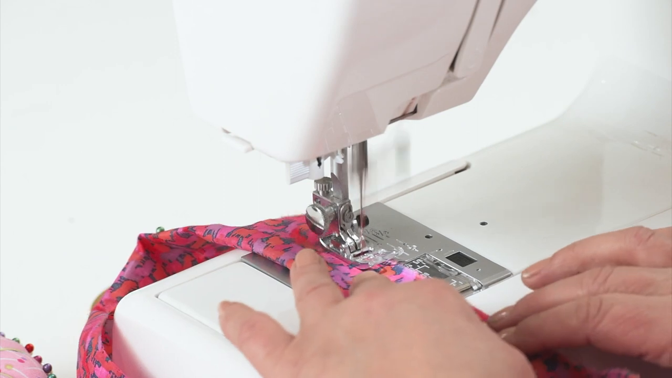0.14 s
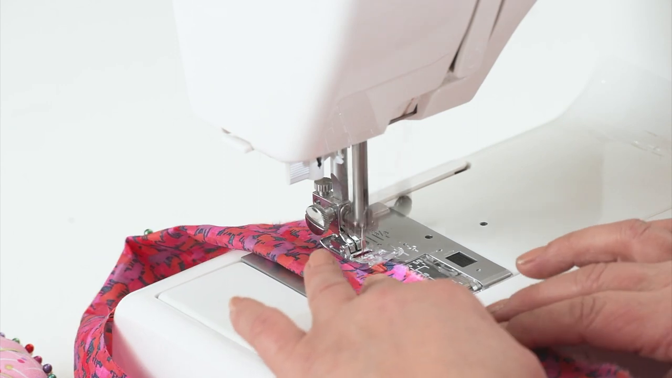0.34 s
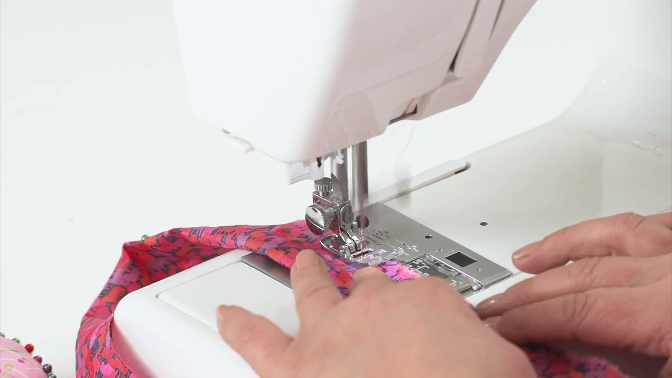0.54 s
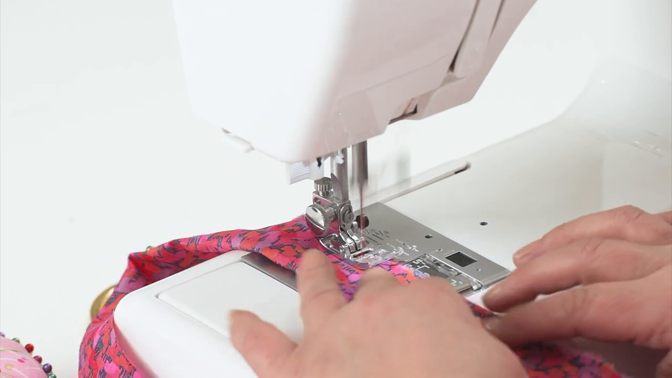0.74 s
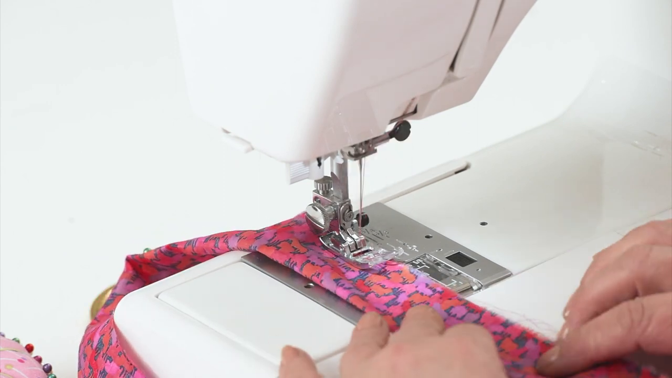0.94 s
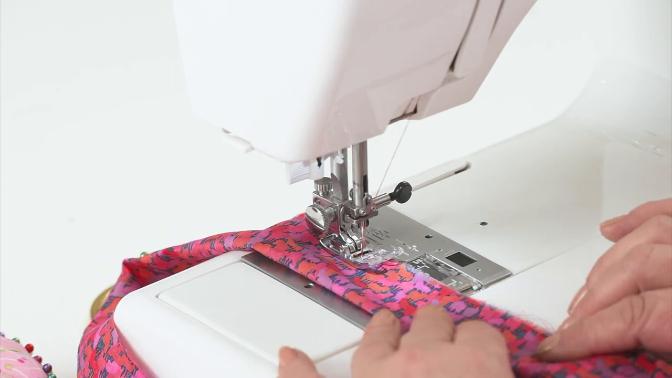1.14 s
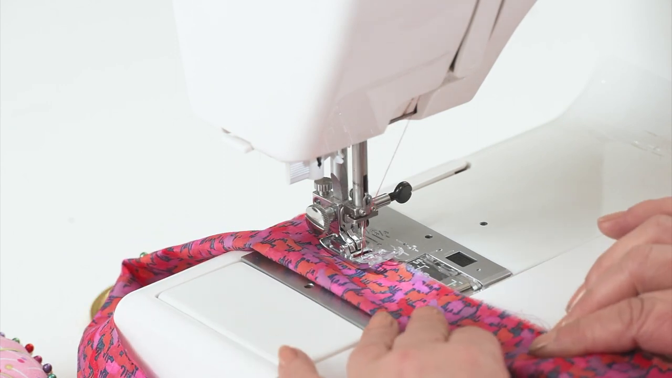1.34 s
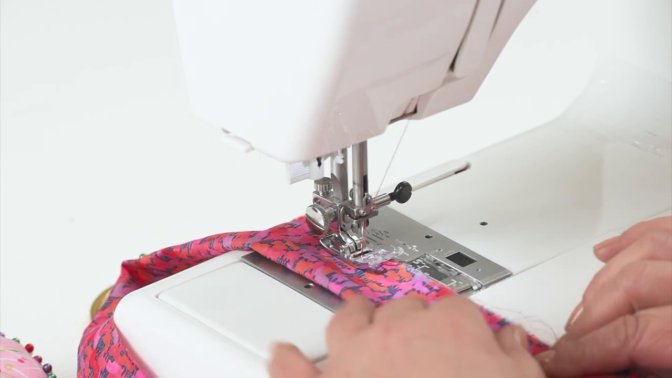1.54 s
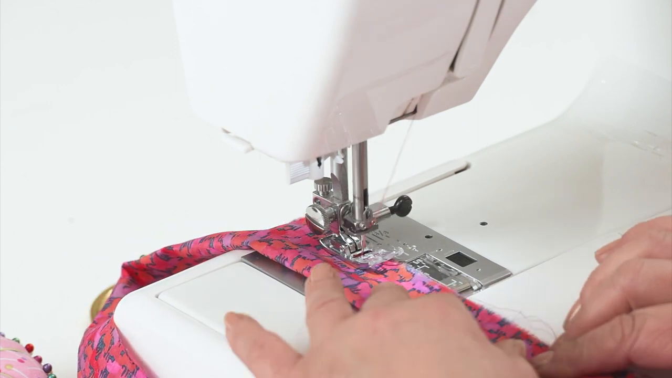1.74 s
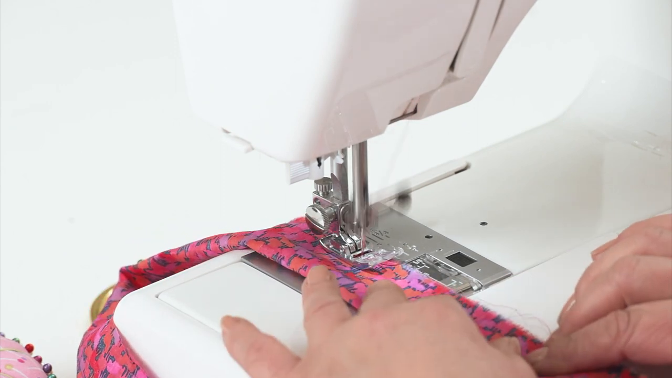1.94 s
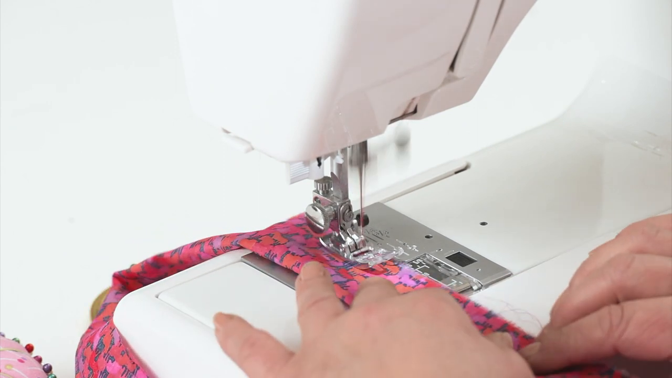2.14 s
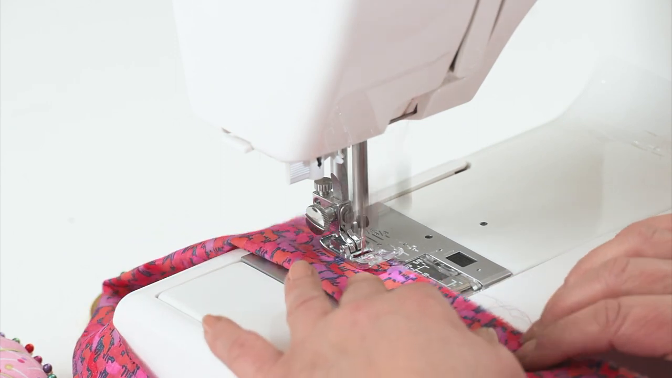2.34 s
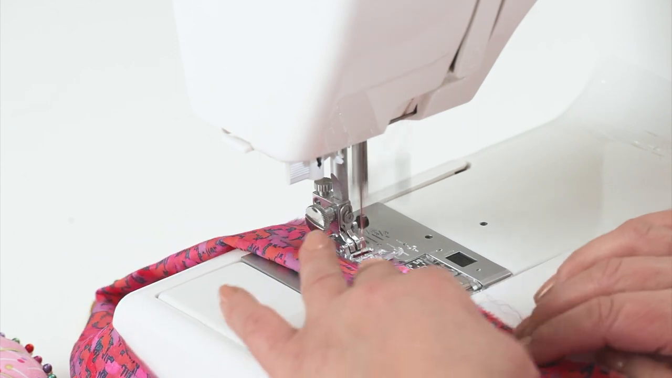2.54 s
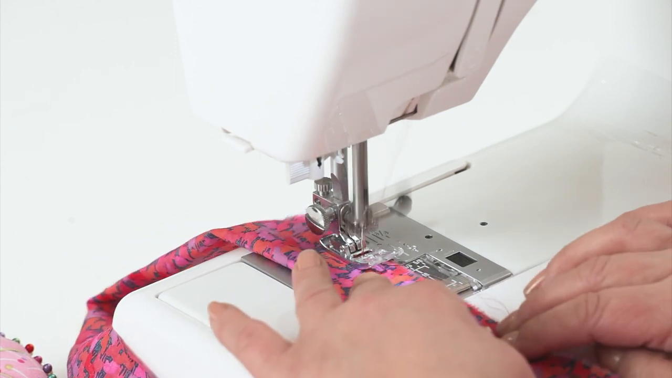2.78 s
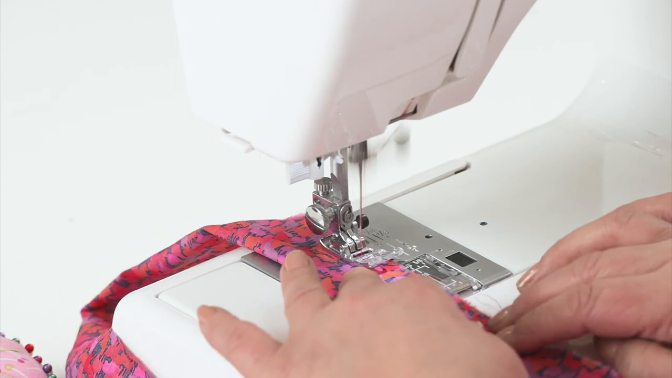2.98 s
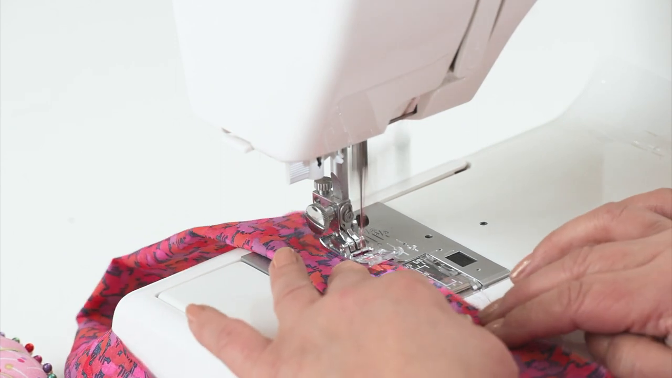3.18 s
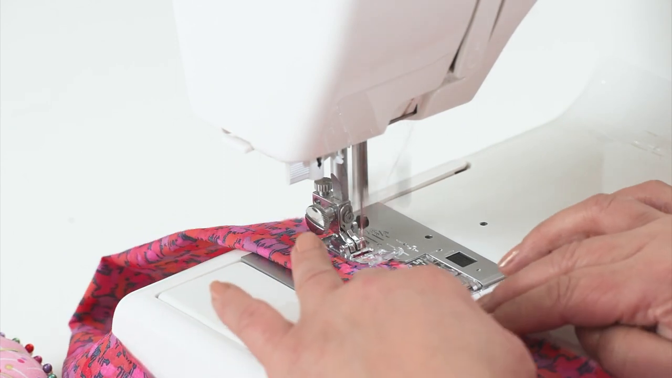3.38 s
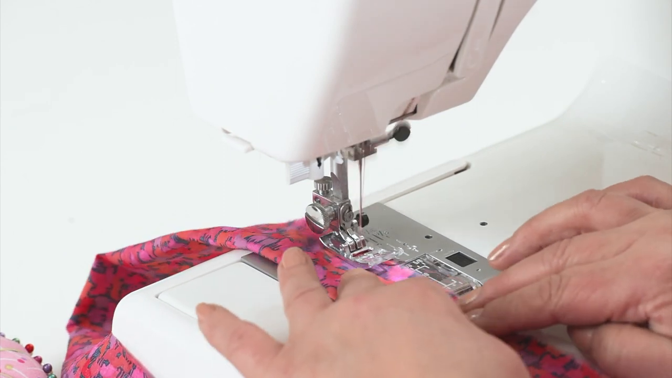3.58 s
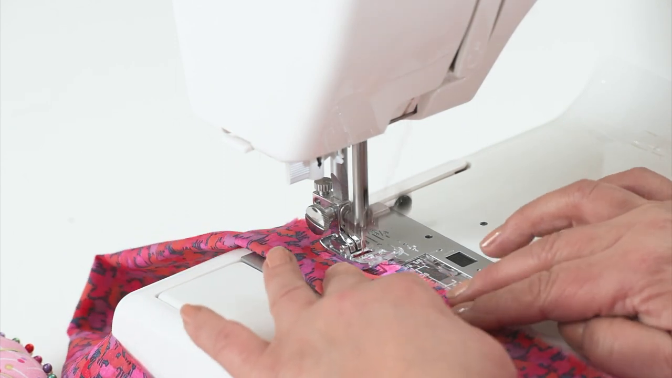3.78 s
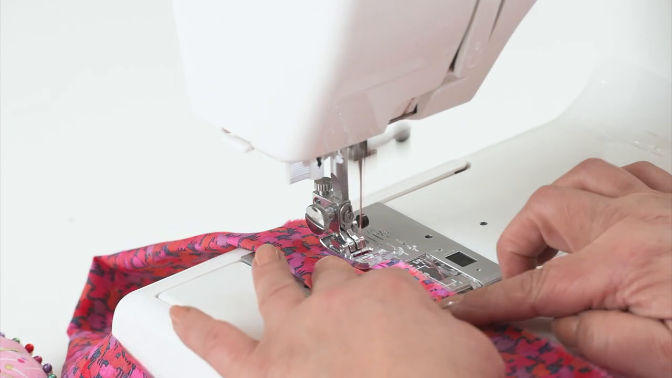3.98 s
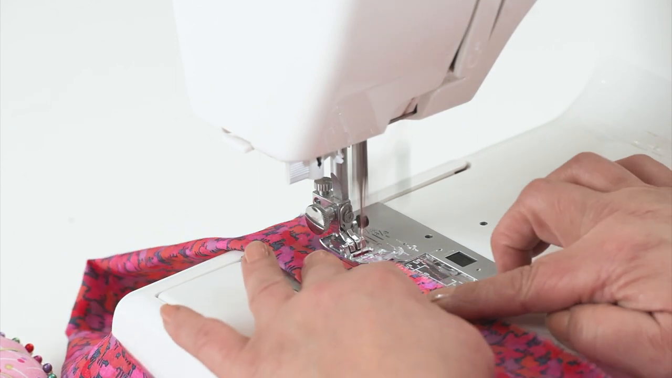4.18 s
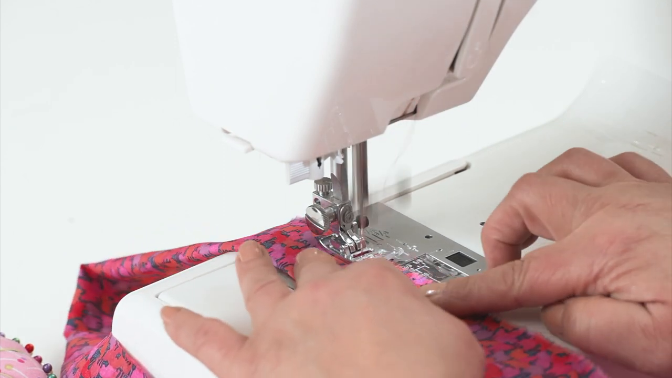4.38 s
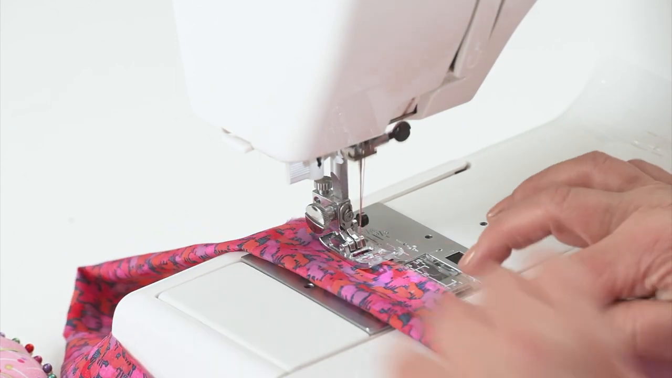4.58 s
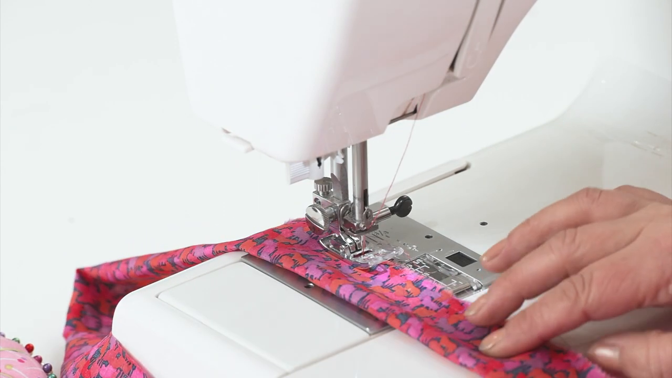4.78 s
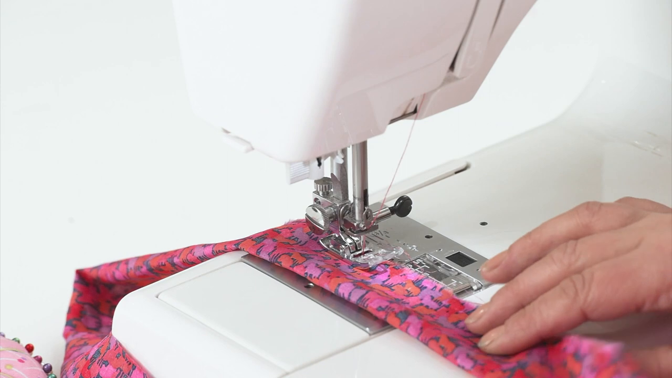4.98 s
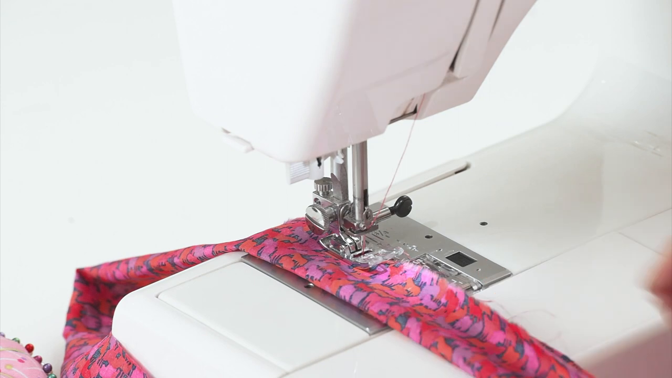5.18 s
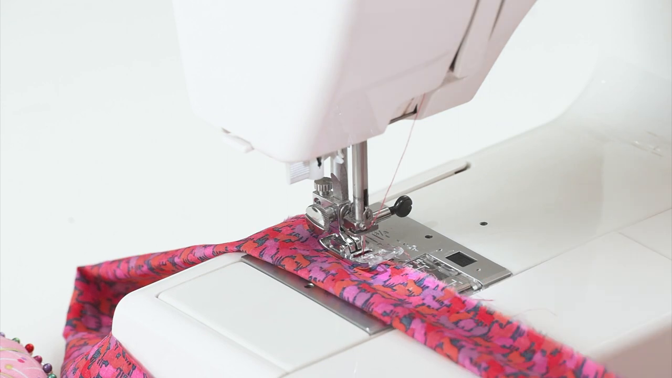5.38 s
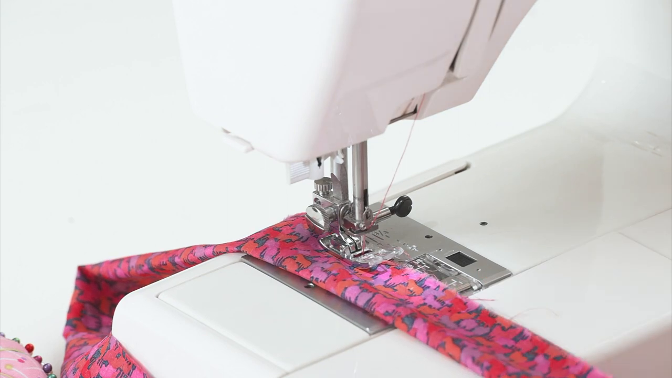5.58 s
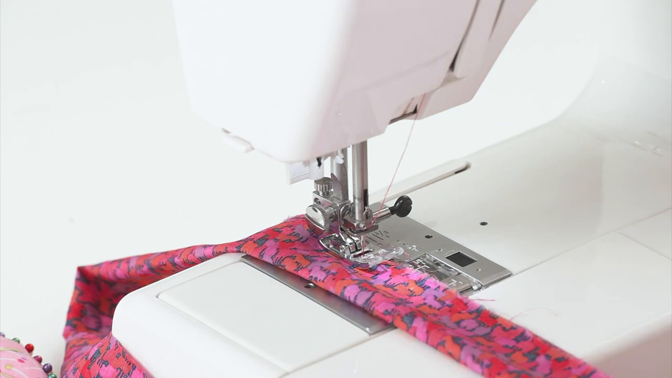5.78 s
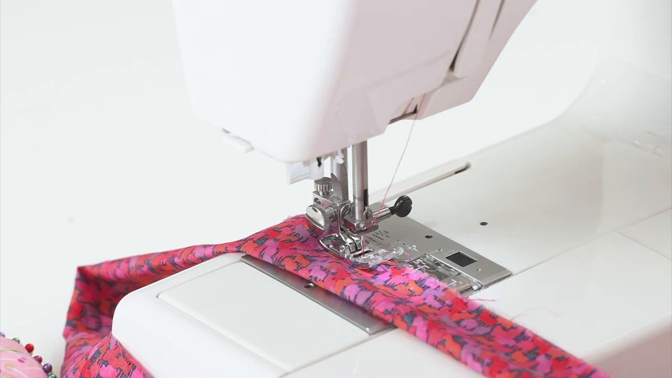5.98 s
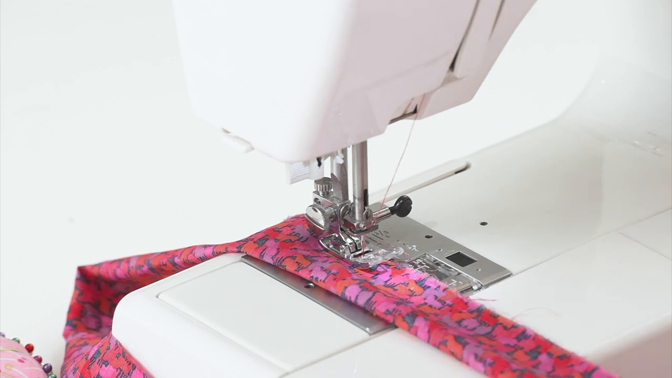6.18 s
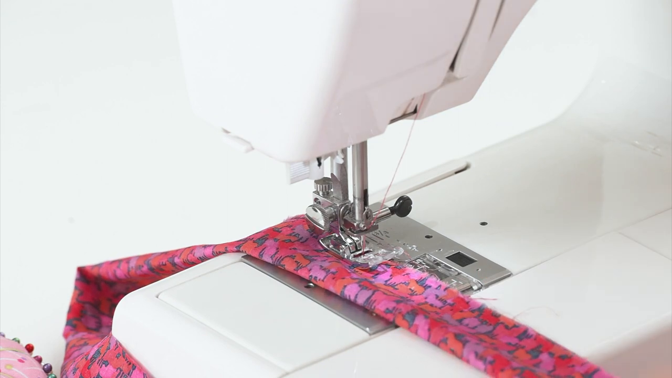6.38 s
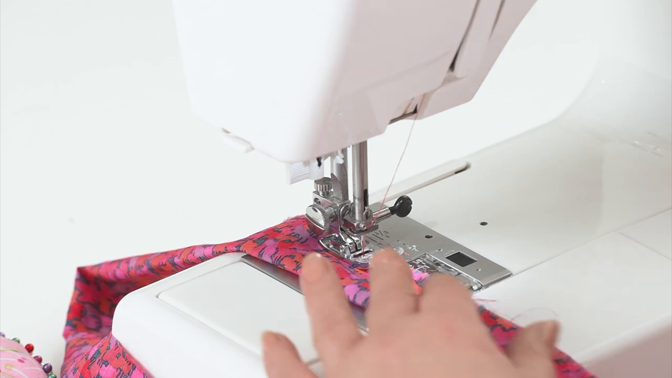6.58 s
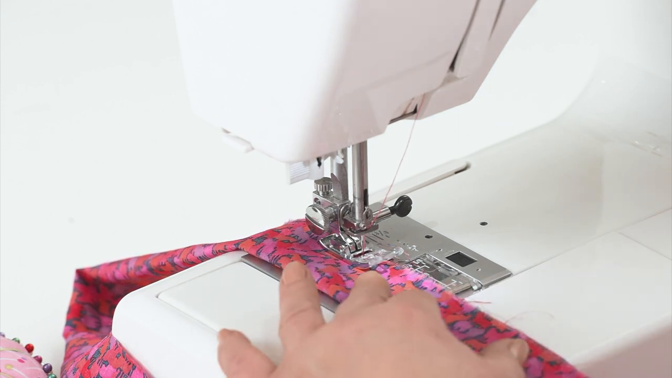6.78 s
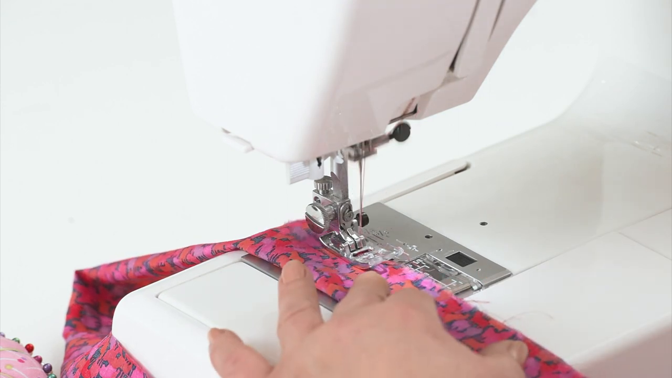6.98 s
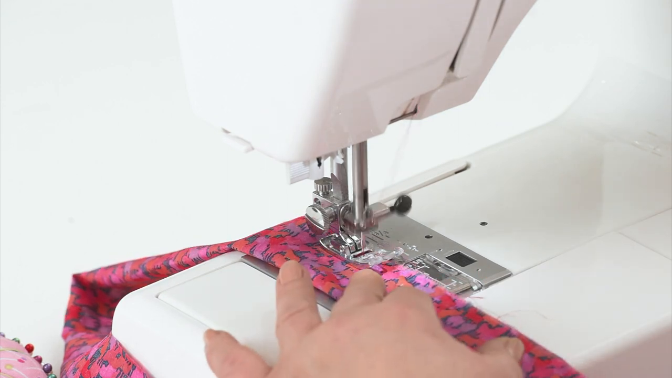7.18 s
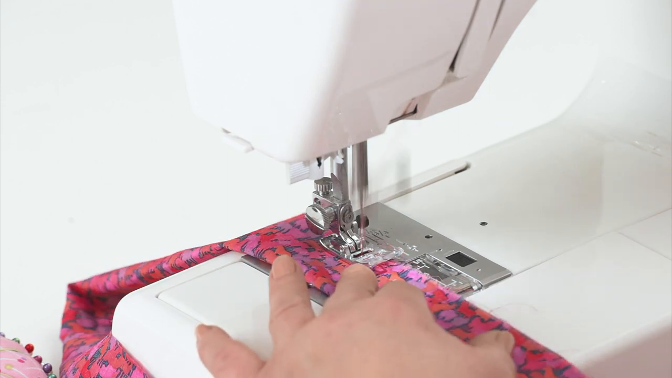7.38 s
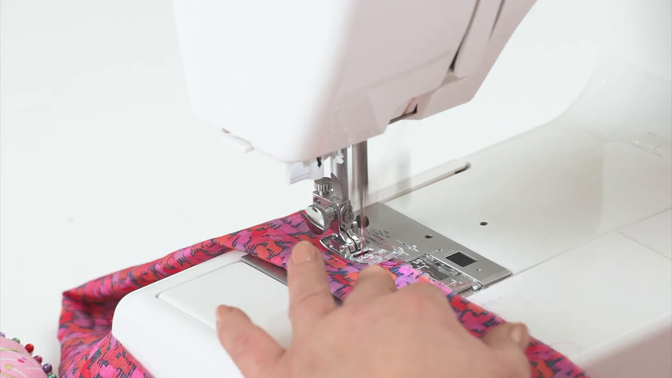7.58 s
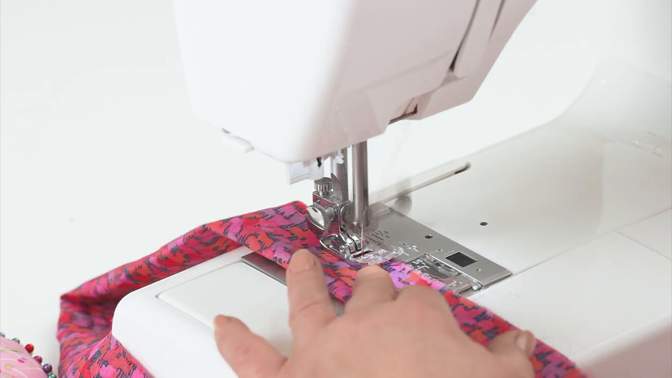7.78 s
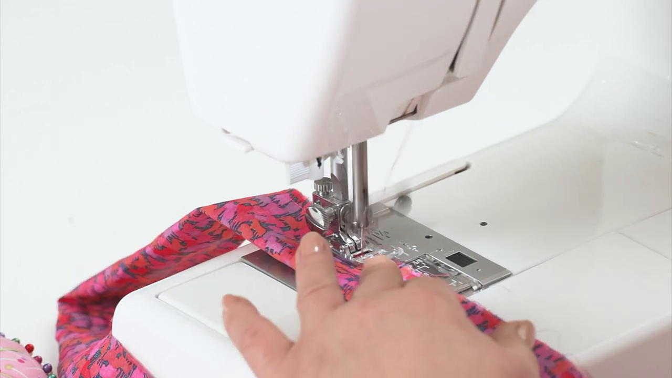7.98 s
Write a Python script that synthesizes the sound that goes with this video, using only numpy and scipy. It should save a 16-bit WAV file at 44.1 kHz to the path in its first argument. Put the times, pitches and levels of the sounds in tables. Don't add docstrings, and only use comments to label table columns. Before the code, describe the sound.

Close indoor sound of an electric sewing machine, already stitching at about eleven turns a second: woody, hollow casing knocks, gear rattle, belt whirr, low motor hum and one bright tick per turn. From 0.75 s it slows quickly, with small pedal clunks around 1.0-1.1 s, and nearly stops by 1.3 s. After a faint knock and cloth touch, a click and straining buzz at 1.65 s start the second run; it climbs to full speed by 2.4 s and chatters evenly at twelve turns a second until 4.35 s. It winds down by 4.9 s. At 5.04 s a hand drops on the table with a quick, dull rebounding knock; sparse clicks and soft fabric rustles follow over faint room tone. At 6.7 s the motor hums and groans again, loud at 7.1 s, and the ticking rattle accelerates until the cut at about 8 s.

```python
import sys
import numpy as np
from scipy import signal
from scipy.fft import rfft, irfft, next_fast_len
from scipy.io import wavfile

SR = 44100
rng = np.random.default_rng(int(sys.argv[2]) if len(sys.argv) > 2 else 0)


def to_wav(sig):
    pcm = np.clip(np.atleast_2d(sig), -1, 1) * 32767
    pcm = np.round(pcm).astype(np.int16)
    wavfile.write(sys.argv[1], SR, pcm.T)


def how_loud(loudness_db):
    steps = np.asarray(loudness_db, float) / 20
    return 10 ** steps


N = 354123
FULL_SPEED = 12


def rms_one(x):
    return x / np.sqrt(np.mean(x ** 2) + 1e-20)


def in_time(rows, outside=None):
    s, *columns = np.transpose(rows)
    return [np.interp(np.arange(N) / SR, s, c, left=outside, right=outside) for c in columns]


def band(x, low_hz, high_hz):
    edges = [low_hz, min(high_hz, .45 * SR)]
    return signal.sosfilt(signal.butter(2, edges, "band", fs=SR, output="sos"), x)


def drift(rate):
    r = np.exp(-80 * np.pi * rate / SR)
    white = rng.standard_normal(N // 40 + 2002)
    slow = signal.lfilter([1], [1, -2 * r, r * r], white)[2000:]
    return np.interp(np.arange(N) / 40, np.arange(len(slow)), rms_one(slow))


def ring(clicks, hz, t60):
    r, w = how_loud(-60 / (t60 * SR)), 2 * np.pi * hz / SR
    return signal.lfilter([0, np.sin(w)], [1, -2 * r * np.cos(w), r * r], clicks + 1e-18)


def clicks_at(seconds, sizes):
    at, out = np.round(seconds * SR).astype(int), np.zeros(N)
    inside = (at >= 0) & (at < N)
    np.add.at(out, at[inside], sizes[inside])
    return out


def bursts(seconds, peak_db, t60):
    fall = how_loud(-60 / (t60 * SR))
    envelope = signal.lfilter([1], [1, -fall], clicks_at(seconds, how_loud(peak_db)) + 1e-18)
    return envelope * rng.standard_normal(N)


def tone(hz, gain, orders):
    phase = 2 * np.pi * np.cumsum(hz) / SR
    return np.sqrt(2) * gain * sum(how_loud(db) * np.sin(int(k) * phase) for k, db in orders)


def noise_bands(spectrum):
    edges, white = 20 * 2 ** (np.arange(30) / 3), rng.standard_normal((2, N))
    hz, db = np.transpose(spectrum)
    for k, (low, high) in enumerate(zip(edges, edges[1:])):
        centre = np.sqrt(low * high)
        gain = how_loud(np.interp(np.log(centre), np.log(hz), db))
        yield centre, gain * band(white[k % 2], low, high)


# time [s], speed [turns per s].
SPEED = [(0, 11.028), (.732, 10.726), (.83, 7.45), (1.27, .674), (1.64, .674), (1.8, 3.3), (1.93, 6.045),
         (2.133, 9.91), (2.411, 11.535), (2.878, 11.994), (4.338, 12.08), (4.515, 7.069), (4.92, .198),
         (6.74, .198), (6.93, 3.866), (7.206, 8.427), (7.486, 10.041), (8.03, 10.863)]


def shaft():
    speed, = in_time(SPEED)
    return np.cumsum(speed) / SR - .67, speed


def speed_at(seconds):
    return np.interp(seconds, *np.transpose(SPEED))


def contact_times(turns, share, jitter_s):
    angle = np.arange(-1, turns[-1])[:, None] + share
    at = np.interp(angle, turns, np.arange(N) / SR, left=-1, right=-1)
    return at + jitter_s * rng.standard_normal(at.shape)


# speed [turns per s], then the levels of casing, gears,
# brushes and air hiss [dB].
LOUDNESS = [(.25, -80, -85, -75, -76), (.7, -62, -82, -75.5, -78), (2.1, -47, -60.5, -68.5, -76),
            (4, -35, -51, -61.5, -70), (6, -31, -40.5, -58.5, -63), (9, -27.5, -36.5, -53, -64),
            (10.8, -27.5, -35, -51, -64), (12, -23.5, -32.5, -50, -62)]


def running_levels(speed):
    law_speed, *levels = np.transpose(LOUDNESS)
    return [np.interp(speed, law_speed, db) for db in levels]


# resonance [Hz], level [dB], ring time t60 [s].
THUD = [(155, -2, 0.078), (223, 0, 0.049)]


def needle_bar(turns):
    at = contact_times(turns, .375, jitter_s=0.00049).ravel()
    in_step = np.exp(-((speed_at(at) - 10.64) / 0.88) ** 2)
    spread_db = 4 * (1.2 - in_step) * rng.standard_normal(len(at))
    thuds = clicks_at(at, -how_loud(-5 + 22.5 * in_step + spread_db))
    return sum(how_loud(db) * ring(thuds, hz, t60) for hz, db, t60 in THUD)


# place [share of turn], signed direction of the push, level [dB].
CONTACTS = [(0.028, 0.73, -6.5), (0.091, 0.85, -7), (0.152, -1.12, 0.5), (0.191, 1, -10),
            (0.242, -1.5, -10), (.36, -0.75, 3), (0.441, 0.29, 4), (0.488, -0.51, -1), (0.572, 1, -3.5),
            (0.678, 0.7, -2.5), (0.789, 0.81, -2.5), (0.903, -1.06, -11.5)]
# pitch [Hz], level [dB], ring time t60 [s].
CASING = [(49.7, -17, 0.11), (104.5, -17.5, 0.25), (142.5, -.5, 0.17), (205.5, 3.5, 0.07),
          (276.5, -0.5, 0.063), (335, -4.5, 0.14), (375, 0.5, 0.1), (400, -12.5, 0.11), (555.6, -7, 0.19),
          (606, -7.5, 0.081), (735, -13.5, 0.13), (868, -16.5, 0.082)]


def casing(turns, level_db):
    share, way, knock_db = np.transpose(CONTACTS)
    at = contact_times(turns, share, jitter_s=.00025)
    out = 0
    for hz, mode_db, t60 in CASING:
        spread_db = 1.5 * rng.standard_normal(at.shape)
        sizes = way * how_loud(knock_db + mode_db + spread_db)
        out = out + ring(clicks_at(at.ravel(), sizes.ravel()), hz, t60)
    out = rms_one(out) + needle_bar(turns)
    return how_loud(level_db - 5.0) * band(out, 40, 3200)


def tick_db(seconds):
    speed = speed_at(seconds)
    return -25 + 2 * np.log2(speed / FULL_SPEED) - 40 * (speed < 3.4)


# pitch [Hz], level [dB], ring time t60 [s].
HOOK = [(6790, -18, 0.01), (7137, -15, 0.018), (7790, -8.5, 0.0055), (8300, -15, 0.0074)]
# place [share of turn], level against the main tick [dB].
SMALL_TICKS = [(.16, -21.5), (.35, -21), (.47, -19.5), (.65, -35)]


def hook(turns):
    s = contact_times(turns, 0, jitter_s=.0003).ravel()
    peak_db = tick_db(s) + 0.7 * rng.standard_normal(len(s))
    chatter = bursts(s - .001, peak_db, 0.029) + bursts(s + 0.002, peak_db - 13.5, 0.093)
    out = how_loud(-14) * band(chatter, 6100, 7600)
    out += how_loud(-10.5) * band(chatter, 2900, 11800)
    out += how_loud(-18.0) * band(band(chatter, 12400, 12600), 10000, 15500)
    out += sum(how_loud(db - 12.5) * ring(chatter, hz, t60) for hz, db, t60 in HOOK)

    share, under_db = np.transpose(SMALL_TICKS)
    at = contact_times(turns, share, jitter_s=0.00073)
    small_db = tick_db(at) + under_db + 3.5 * rng.standard_normal(at.shape)
    out += how_loud(2.0) * band(bursts(at.ravel(), small_db.ravel(), 0.016), 6100, 13000)
    return out


# place [share of turn], pitch [Hz], level over the gears [dB],
# decay t60 [s].
TAPS = [(0.032, 1820, 4, 0.09), (0.062, 1250, 7, 0.071), (0.113, 1660, -3.5, 0.039),
        (.44, 1300, -13, 0.065), (.55, 2585, -1, 0.041), (0.592, 2340, 1, 0.032), (.66, 2750, -0.5, 0.027),
        (.01, 5190, -8, 0.045)]


def taps(turns, gears_db):
    out = 0
    for share, hz, over_db, t60 in TAPS:
        at = contact_times(turns, share, jitter_s=0.00092).ravel()
        spread_db = 2.0 * rng.standard_normal(len(at))
        out = out + band(bursts(at, over_db + 15 + spread_db, t60), hz * .945, hz * 1.06)
    return how_loud(gears_db) * out


# frequency [Hz], level [dB per Hz].
RATTLE = [(18, -45), (30, -83), (111, -3.5), (302, -2), (363, 1.5), (472, -8.5), (552, -3), (1060, -17),
          (1890, -24.5), (2160, -37.5), (2340, -27.5), (4270, -30), (4750, -28.5), (7040, -26),
          (15900, -51.5)]
# pitch [Hz], width [Hz], level [dB].
RATTLE_PEAKS = [(606, 30, -16.5), (823, 75, -20.5), (1250, 270, -21.5), (1820, 45, -15.5), (2340, 30, -20),
                (2620, 60, -23.5), (4030, 280, -20.5), (4440, 40, -24.5)]


def rattle(turns, casing_db, gears_db, brushes_db, air_db):
    bands, together = list(noise_bands(RATTLE)), drift(38)
    whole = np.sqrt(np.mean(sum(x for hz, x in bands) ** 2))
    swell_db = 1.9 * np.cos(2 * np.pi * (turns - .4))
    out = 0
    for hz, x in bands:
        mid = np.clip(np.log2(hz / 500) / 2.0, 0, 1)
        high = np.clip(np.log2(hz / 3000) / 1.4, 0, 1)
        top_db = brushes_db + 18 if hz < 10000 else air_db + 30.0
        level_db = (1 - mid) * (casing_db - 5.5) + (mid - high) * (gears_db + 14.5) + high * top_db
        patchy_db = 1.3 * together + 0.84 * drift(22)
        out = out + how_loud(level_db + swell_db * (1 - mid) + patchy_db) * x / whole
    white = rng.standard_normal(N)
    for hz, width, db in RATTLE_PEAKS:
        level_db = casing_db if hz < 1000 else gears_db + 3
        peak = rms_one(ring(white, hz, 2.1 / width))
        out = out + how_loud(level_db + db - 1 + 3.5 * drift(10.2)) * peak
    return out


# time [s], level [dB].
HUM = [(0, -34), (.5, -31), (.98, -31), (1.3, -50.5), (1.62, -67), (1.67, -30), (1.74, -22), (2.15, -27.5),
       (2.8, -35), (4.1, -38), (4.5, -27), (4.77, -36.5), (4.92, -58.5), (6.7, -72), (6.79, -35),
       (7.1, -18.5), (7.27, -30), (8.03, -23)]
# multiple of the hum pitch, level [dB].
HUM_ORDERS = [(1, -3.5), (2, -26), (4, -34)]


def hum(turns, speed):
    pulse_db = 4 * (np.cos(2 * np.pi * (turns - .4)) - .7)
    flutter_db = (speed / FULL_SPEED) ** 2 * (4 * drift(4.9) + pulse_db)
    return tone(101.1 + 0.65 * drift(2.66), how_loud(in_time(HUM)[0] + flutter_db), HUM_ORDERS)


# start [s], length [s], cycles per turn, level [dB].
WHINE = [(0, .8, 170, -44.5), (2.2, .45, 449, -48.5), (2.5, 1.9, 449, -60), (7.33, .5, 37, -31),
         (7.16, .32, 330, -46)]


def whines(speed):
    unsteady, out = .6 + .3 * np.tanh(drift(45)), 0
    for s, length, cycles, db in WHINE:
        edge, end = .25 * length, s + length
        fade, = in_time([(s, 0), (s + edge, 1), (end - edge, 1), (end, 0)])
        out = out + unsteady * tone(cycles * speed, how_loud(db) * fade, [(1, 0)])
    return out


# cycles per turn, level against the casing [dB].
TEETH = [(31, -12), (46, -15.5)]


def belt_teeth(turns, casing_db):
    swell_db, out = 4 * np.cos(2 * np.pi * (turns - .4)), 0
    for cycles, db in TEETH:
        gain = how_loud(db + casing_db + swell_db + 2.0 * drift(9.8))
        out = out + gain * np.sin(2 * np.pi * int(cycles) * turns)
    return out


# start [s], length [s],
# buzz level [dB], groan level [dB].
STRAIN = [
    (1.625, .36, -42, -28),
    (6.715, .4, -46, -28),
]


def swell(s, length, peak_share):
    rows = [(s, -32), (s + peak_share * length, 0), (s + length, -13)]
    return how_loud(in_time(rows, outside=-99)[0])


def strain():
    buzz = np.sqrt(2) * np.sin(2 * np.pi * 201.3 * np.arange(N) / SR)
    groan, out = rms_one(ring(rng.standard_normal(N), 365.6, 0.095)), 0
    for s, length, buzz_db, groan_db in STRAIN:
        jolt, = in_time([(s, 0), (s + .025, 1), (s + .057, 1), (s + .082, 0)], outside=0)
        pull, moan = swell(s, length, .85), swell(s, length, .68)
        out = out + how_loud(buzz_db) * (jolt + how_loud(9) * pull) * buzz
        out = out + how_loud(groan_db) * moan * groan
    return out


# time [s], peak [dB], centre [Hz], decay t60 [s].
KNOCKS = [(1.361, -48.5, 606, 0.092), (1.662, -35, 519, 0.031), (4.955, -48, 845, 0.074),
          (5.037, -27.5, 676, 0.15), (5.395, -48, 1250, 0.13), (6.758, -42.5, 565, 0.13)]
# time [s], peak [dB], centre [Hz], decay t60 [s].
CLICKS = [(1.1074, -51, 4400, 0.028), (1.633, -44, 3080, 0.028), (4.5094, -45, 7930, 0.032),
          (4.6783, -44, 8810, 0.03), (4.8219, -45, 8350, 0.037), (4.8344, -47, 8240, 0.032),
          (4.9766, -50, 7530, 0.025), (5.0374, -48, 8360, 0.037), (5.0384, -34, 2030, 0.04),
          (5.236, -49.5, 4830, 0.017), (5.3961, -56, 2260, 0.022), (5.4024, -46, 5910, 0.03),
          (5.6361, -59, 3960, 0.023), (6.724, -49, 2180, 0.031), (7.0574, -44, 8830, 0.03)]


def knocks():
    out, t = np.zeros(N), np.arange(SR // 3) / SR
    for s, peak_db, hz, t60 in (*KNOCKS, *CLICKS):
        white = rng.standard_normal(len(t)) * how_loud(-60 * t / t60)
        white[0] = 1.9
        burst = band(band(white, hz * 0.25, hz * 1.36), hz * 0.3, hz * 2.8)
        out[round(s * SR):][:len(t)] += how_loud(peak_db) * burst / np.abs(burst).max()
    return out


# time [s], peak [dB], softness [dB per octave].
CLUNK = [
    (5.038, -33, 3),
    (5.0446, -30.5, 2.5),
    (5.0506, -26, 4.5),
    (5.0554, -32.5, 7),
    (0.991, -42, 0),
    (1.119, -34, 0),
    (1.108, -40, -2),
    (5.396, -60, -5.5),
]
# pitch [Hz], level [dB], ring time t60 [s].
TABLE = [(222, -13, 0.21), (343, 0.5, 0.065), (550, 2.5, 0.075), (657, -1.5, 0.055), (672, -1.5, 0.048),
         (842, -7, .06), (1160, -12, 0.068), (1300, -10, 0.1), (1420, -9, 0.065), (1620, -13, .1)]


def clunk():
    s, peak_db, soft_db = np.transpose(CLUNK)
    body = 0
    for hz, db, t60 in TABLE:
        sizes = how_loud(peak_db + db - soft_db * np.log2(hz / 200))
        body = body + ring(clicks_at(s, sizes), hz, t60)
    return band(body, 110, 1540)


# start [s], length [s], rustle level [dB], scuff level [dB].
CLOTH = [(1.25, 0.088, -73, -70), (1.56, .06, -75, -69), (4.845, .1, -73, -61), (5.052, .1, -74, -52),
         (5.19, 0.078, -70, -64), (5.287, 0.11, -68, -72), (5.405, 0.19, -67, -59),
         (5.62, 0.27, -68, -67.5), (6.075, .06, -71, -79), (6.19, .07, -71, -75), (6.27, .07, -63, -74),
         (6.55, 0.17, -70, -74), (6.709, 0.038, -62, -56)]


def cloth():
    grains = rng.standard_normal((2, N)) * how_loud(1.5 * rng.exponential(1, (2, N)))
    hiss, scuff = rms_one(band(grains[0], 3300, 9800)), rms_one(band(grains[1], 260, 1140))
    edge, out = .02, 0
    for s, length, rustle_db, scuff_db in CLOTH:
        lift = s + max(length - edge, edge)
        stroke, = in_time([(s, 0), (s + edge, 1), (lift, .7), (s + length + edge, 0)])
        out = out + stroke * (how_loud(rustle_db) * hiss + how_loud(scuff_db) * scuff)
    return out * how_loud(2 * drift(27))


def room(x):
    t60_s, wall_cut_hz = .55, 3000
    size = next_fast_len(N + SR)
    w = 2 * np.pi * np.arange(size // 2 + 1) / size
    wall = 1 / np.sqrt(1 + (w * SR / (2 * np.pi * wall_cut_hz)) ** 2)
    tail = 0
    for k, lag in enumerate(rng.uniform(.015, .045, 10) * SR):
        back = how_loud(-60 * lag / SR / t60_s) * wall * np.exp(-1j * w * int(lag))
        tail = tail + (-1) ** k * back / (1 - back)
    return irfft(rfft(x, size) * tail, size)[:N]


# frequency [Hz], level [dB per Hz].
ROOM_TONE = [(12, -31), (20, -5), (43, 5), (113, -0.5), (167, -9), (365, -18.5), (657, -24), (999, -22.5),
             (2310, -33.5), (4390, -32), (5650, -43), (14200, -34.5), (15900, -38)]


def room_tone():
    return how_loud(-54) * rms_one(sum(x for hz, x in noise_bands(ROOM_TONE)))


def scene():
    turns, speed = shaft()
    casing_db, gears_db, brushes_db, air_db = running_levels(speed)
    machine = casing(turns, casing_db) + hook(turns) + taps(turns, gears_db)
    machine += rattle(turns, casing_db, gears_db, brushes_db, air_db)
    machine += hum(turns, speed) + whines(speed) + belt_teeth(turns, casing_db) + strain()
    hands = knocks() + clunk()
    wet = room(how_loud(-24.5) * machine + how_loud(-20.5) * hands)
    return (machine + hands + wet + cloth() + room_tone())[None]


def roll_off(x):
    return signal.sosfilt(signal.butter(12, 16020, fs=SR, output="sos"), x)


def record(dry):
    mix = signal.sosfilt(signal.cheby2(24, 90, 16150, fs=SR, output="sos"), dry)
    return roll_off(mix)


dry = scene()
out = record(dry)
to_wav(out)
```